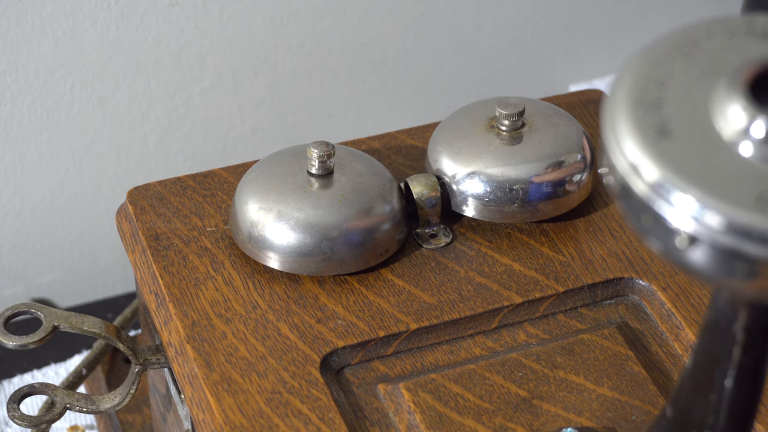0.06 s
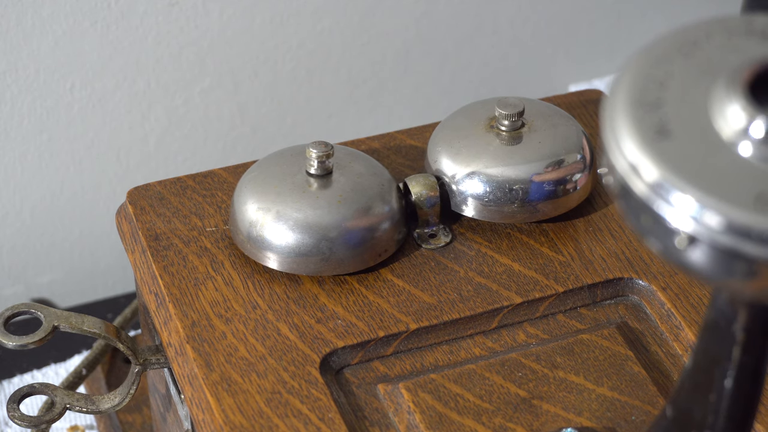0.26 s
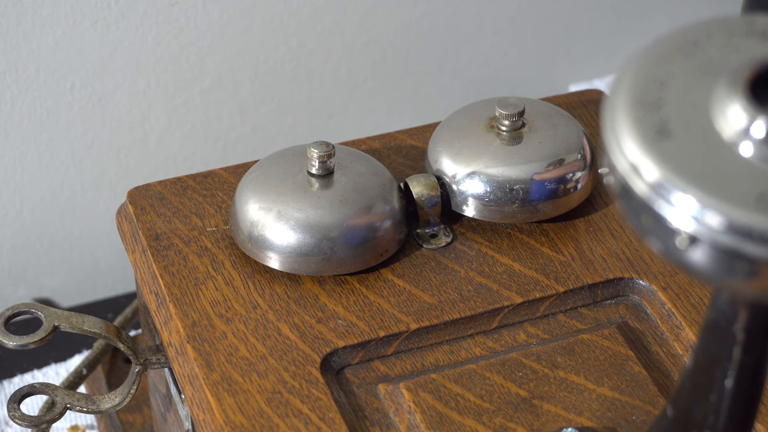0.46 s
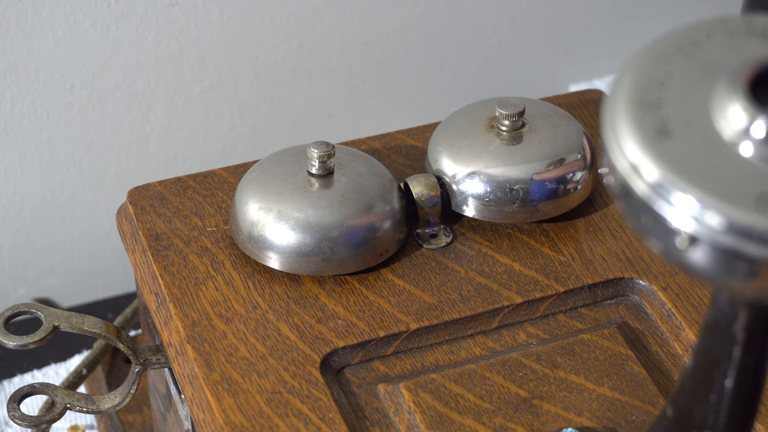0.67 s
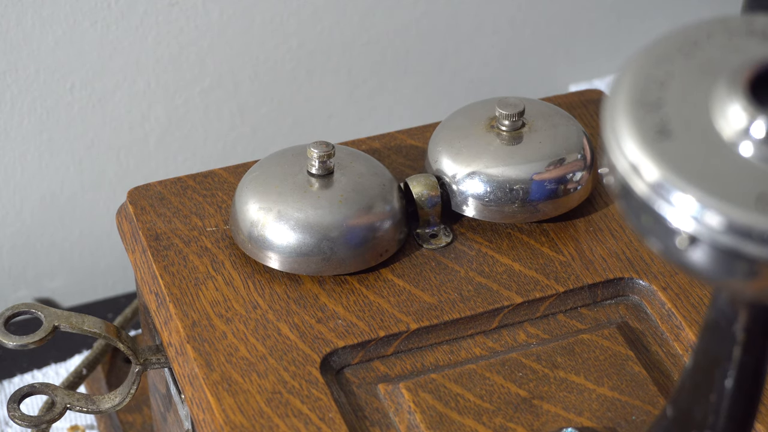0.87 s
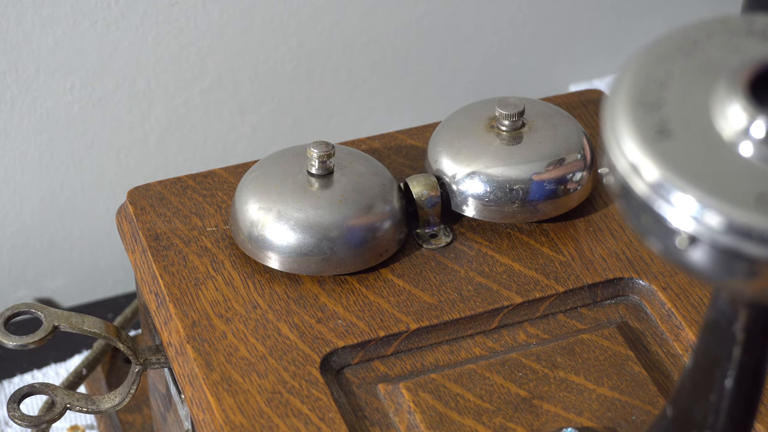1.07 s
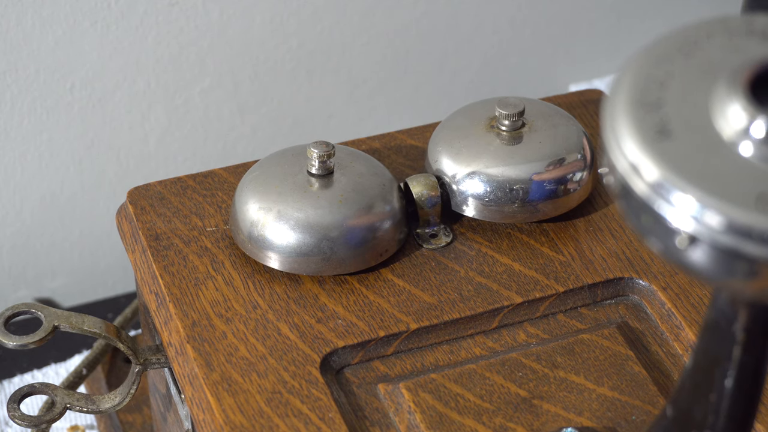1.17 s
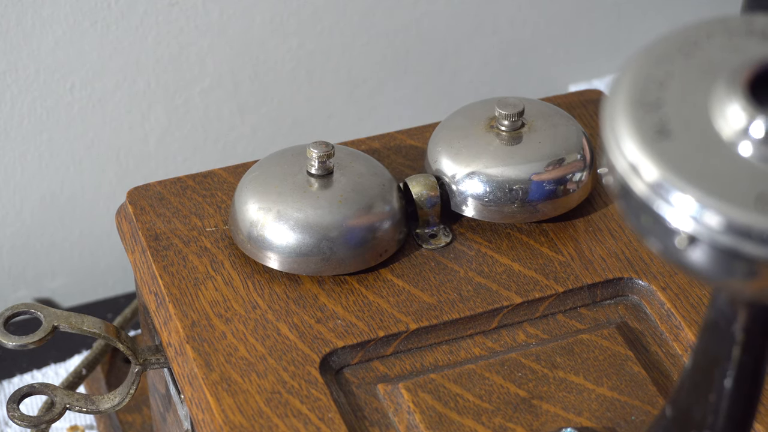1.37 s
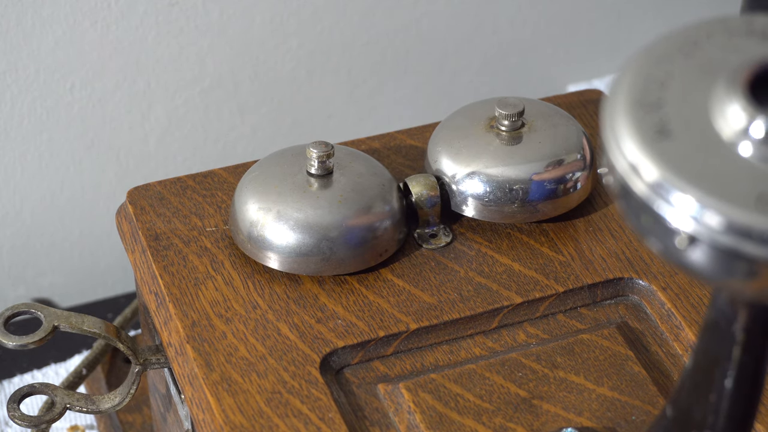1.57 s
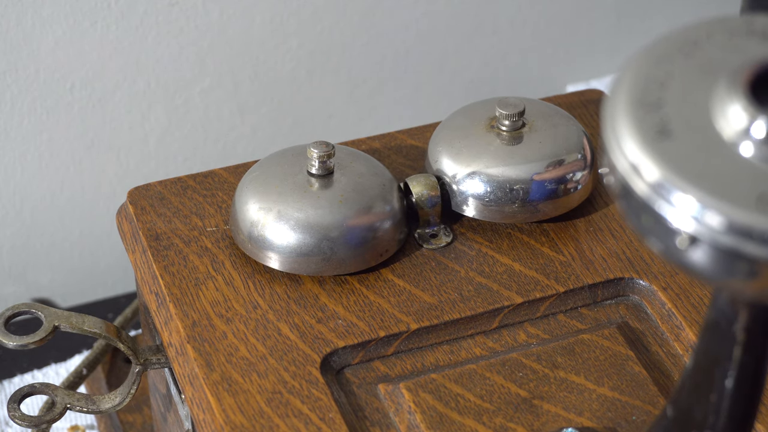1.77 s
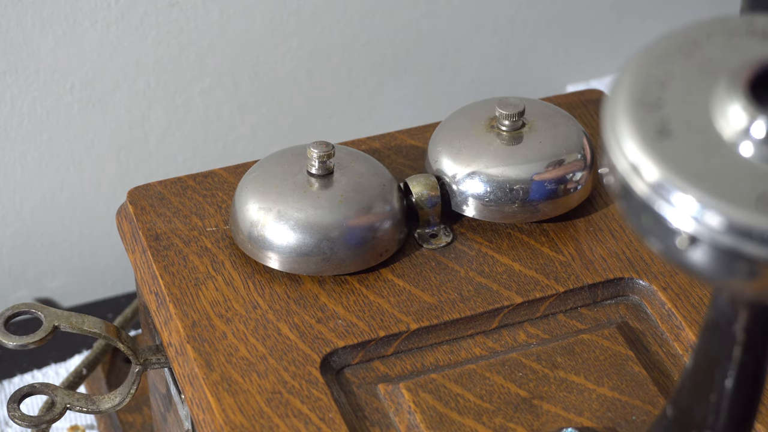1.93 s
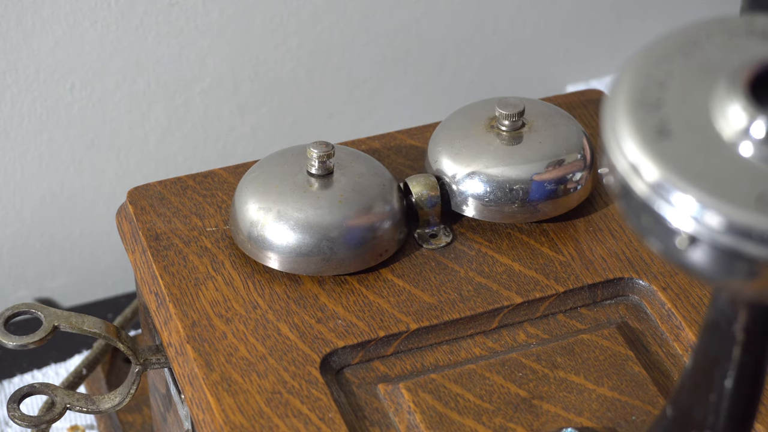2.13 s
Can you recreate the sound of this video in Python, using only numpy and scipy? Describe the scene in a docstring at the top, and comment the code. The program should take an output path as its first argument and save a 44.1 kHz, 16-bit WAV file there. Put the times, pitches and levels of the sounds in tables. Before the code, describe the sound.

An old telephone's two metal bells ring in a short, bright rattle and fade as crank gears rumble in its wooden case. A second turn brings another jingle, quickly choked. Heard close up in a small, quiet room.

```python
"""An old wooden wall telephone is cranked twice, close by, in a small, quiet room. One of its two steel
gongs is still ringing faintly as the gears start to rumble and knock in the case. The clapper chatters
on the low gong and brushes the high one, and both ring out with a slow wobble. On the second turn the
clapper chatters again, then stays on the low gong and chokes it. All along, a limiter (an automatic
volume control) ducks under the blows and swells back."""
import sys
import numpy as np
from scipy import signal
from scipy.fft import rfft, irfft, next_fast_len
from scipy.io import wavfile
from scipy.ndimage import uniform_filter1d, minimum_filter1d, map_coordinates

SR = 44100
rng = np.random.default_rng(int(sys.argv[2]) if len(sys.argv) > 2 else 0)


def store_pcm(level_fs):
    """Save levels as 16-bit WAV."""
    pcm = np.round(np.clip(level_fs, -1, 1) * 32767).astype(np.int16)
    wavfile.write(sys.argv[1], SR, np.atleast_2d(pcm).T)


N = 97020

# tone of the room's hush, a deep rumble and a faint hiss: f/Hz, level/dB
HUSH_TONE = [(25, -19), (60, -14), (130, -5), (220, -6.5), (320, 4), (450, -5), (800, -20.5), (2000, -18),
             (5000, -36.5), (16000, -35.5)]
RUMBLE_TONE = [(20, -3), (45, -3), (110, 0), (200, -8), (400, -40), (2000, -80)]
HISS_TONE = [(500, -20), (3000, -3), (6000, 0), (10000, -1), (16000, -3)]
# how the rumble and the hiss come and go: t/s, level/dB
RUMBLE_LEVEL = [(0, -61), (.2, -57.5), (.27, -68), (.45, -58), (.65, -66.5), (.8, -85)]
HISS_LEVEL = [(0, -66), (.21, -59.5), (.3, -82.5), (.9, -86), (1.1, -74), (1.25, -80), (1.4, -71),
              (1.9, -92.5)]
# stereo width of the noises: f/Hz, side level/dB
STEREO_WIDTH = [(100, -29), (250, -19.5), (500, -13.5), (1000, -9), (2000, -8), (8000, -2)]

# loudness of the gears in each turn of the crank: t/s, level/dB
FIRST_TURN = [(0, -56.5), (.05, -54), (.12, -54.5), (.21, -50), (.25, -34.5), (.3, -36), (.342, -21.5),
              (.365, -32), (.41, -30), (.445, -32), (.48, -38), (.54, -48.5), (.68, -63.5), (.9, -76)]
SECOND_TURN = [(1.02, -65), (1.12, -57.5), (1.32, -63), (1.36, -49.5), (1.385, -38.5), (1.46, -41.5),
               (1.505, -35), (1.535, -26.5), (1.61, -31), (1.635, -33), (1.73, -48.5), (1.83, -65),
               (1.98, -91), (2.12, -63.5), (2.2, -66)]
# resonances of the wooden case: f/Hz, width/Hz, level/dB
CASE_RESONANCES = [(123, 25, -4.5), (201, 12, -3.5), (314.4, 17, 4.5), (500, 17, 7.5), (599, 37, 1.5),
                   (708, 27, -2.5), (1040, 48, -5)]
# knocks of the gears: t/s, thud level/dB, tick level/dB, t60/s (the time to fade by 60 dB)
KNOCKS = [(0.023, -40.5, -45.5, 0.14), (0.13, -33.5, -49, .14), (0.223, -58, -23.5, 0.03),
          (0.425, -50.5, -29.5, 0.3), (1.03, -75, -57.5, 0.49), (1.109, -47.5, -45, 0.23),
          (1.213, -45, -60.5, 0.11), (1.358, -47.5, -53, 0.12), (1.394, -49, -49.5, 0.069),
          (1.483, -44, -57.5, 0.048), (1.547, -42, -17.5, 0.025), (2.053, -60.5, -59.5, 0.17),
          (2.092, -72, -75, 0.23)]
# tone of the gears and of their ticks: f/Hz, level/dB
GEAR_TONE = [(40, -32.5), (80, -20), (125, -4), (230, -2), (320, -0.5), (550, -4), (800, -3.5),
             (1300, -8.5), (2200, -9.5), (3200, -15), (5000, -21.5), (8000, -35), (16000, -48.5)]
TICK_TONE = [(100, -19.5), (600, -20), (1200, -2), (1750, -2.5), (2050, 7), (2350, -9.5), (2900, -9),
             (4200, -8), (6000, -21), (10000, -27), (16000, -48)]

# pitches of each gong's modes (the pure tones it rings with): f/Hz
LOW_HZ = [1013, 2601, 4641, 7031, 9762, 12822, 15235, 15726]
HIGH_HZ = [1379, 3444.5, 6010, 8998, 12391]
# one row per mode: level/dB, t60/s, left over right/dB, side level/dB
LOW_MODES = [(-42, 1.5, -1.5, -10.5), (-33, 1.46, -2, -6.5), (-26, 1.76, -5, -7), (-15.5, 0.99, -2, -10.5),
             (-8, 0.62, 1, -18), (-16.5, 0.27, 0.5, -8.5), (-18.5, 0.075, 1.5, -3.5), (-20, 0.062, 4, -6)]
HIGH_MODES = [(-48.5, 28, 0.5, -23), (-34, 10.4, 2, -8), (-31, 3.43, -0.5, -22.5), (-26, 1.37, 4.5, -0.5),
              (-40, .9, 6.5, -2)]
# each mode wobbles (beats) against a close twin: beat f/Hz, depth from 0 to 1
LOW_BEATS = [(1, .05), (2, .15), (1.5, .1), (8, .25), (9, .15), (7, .12), (200, .4), (130, .5)]
HIGH_BEATS = [(3.05, .65), (2, .5), (1.1, .25), (6.3, .6), (5.5, .3)]
# clapper hits (a negative time is before the start): t/s, level/dB, brightness/(dB per octave)
LOW_HITS = [(0.2331, 0.5, 0.5), (0.266, -1, 4), (0.2755, -4, 0), (0.2828, -11, -6), (0.29, -2, 7),
            (.308, -1, -2), (0.323, -9, -1.5), (.3542, 5, -0.5), (0.3748, 2.5, 5.5), (1.555, -2, 0),
            (1.592, -15.5, 13), (1.619, 5.5, -0.5), (1.65, -2, -4), (1.663, -7.5, 1.5), (1.6755, -10.5, -6),
            (1.6867, -5, -2.5), (1.698, -25, -11), (1.7114, -10.5, -2), (1.7185, -25, 2),
            (1.7238, -12, -2.5), (1.737, -11, 2.5), (1.748, -20.5, -2.5), (1.7547, -2.5, 2.5),
            (1.7608, 2.5, 1.5), (1.7745, -2.5, 0), (1.785, -24, -12), (1.7965, -30, -2), (1.801, -15, -1.5),
            (1.814, -11.5, 6)]
HIGH_HITS = [(-1.994, -22, -9.5), (.345, 2.5, 3.5)]
# change in what a hit gives each low-gong mode once the clapper leans on it: level/dB
LOW_LEAN = [-25.5, 4, 3, 0, -1, -1, 1.5, 0.5]
# light damping of each high-gong mode from DAMP_S on: extra fade/(dB per s)
HIGH_DAMPING = [5.6, 15, 41, 60, 60]

# tone of the clapper's crack, its mounting's clatter and the room's echo: f/Hz, level/dB
CRACK_TONE = [(500, -13), (3000, -1.5), (7000, 10), (10000, 1), (14000, 12), (16000, -1)]
CLATTER_TONE = [(60, -20), (150, -6.5), (400, -0.5), (1000, -1.5), (2000, 1), (3000, -7.5), (4200, -1.5),
                (5500, -16.5), (8000, -5.5), (11000, -6), (16000, -33)]
ECHO_TONE = [(100, -14.5), (7000, 10.5), (16000, -7)]
# what the limiter listens to: f/Hz, level/dB
LIMITER_EAR = [(100, -12), (7000, -39), (10000, -12), (13000, -13.5), (15000, 1.5)]

LEAN_S, DAMP_S = 1.5, 1.78  # the clapper leans towards the low gong, then rests on it
CHOKE_DB_PER_S = 157
ENERGY_KEPT, KICK_RAD = 0.29, 0.99  # share of ringing that outlasts a hit; typical jolt out of step
CONTACT_S, ATTACK_S = 0.0017, 0.0014  # length of a clapper hit; rise of a noise burst
TWIN_SPREAD_RAD = 0.17  # how differently the two ears hear the wobble
LIMIT_DB, RELEASE_DB_PER_S, HOLD_S = -25, 127, 0.0067
TIME = np.arange(N) / SR


def amp(db):
    """Turn decibels into a gain."""
    return 10 ** (np.asarray(db) / 20)


def fader(points):
    """A gain that glides through (t/s, level/dB) points."""
    return amp(np.interp(TIME, *np.transpose(points)))


def gains(points, hz):
    """Read gains from (f/Hz, level/dB) points on a log frequency axis."""
    f, db = np.transpose(points)
    return amp(np.interp(np.log(hz + 1), np.log(f + 1), db))


def filtered(x, response):
    """Scale each frequency in x by response(hz)."""
    size = next_fast_len(N + SR // 2)
    return irfft(rfft(x, size) * response(np.fft.rfftfreq(size, 1 / SR)), size)[..., :N]


def unit(x):
    """Scale to an average power of 1."""
    return x / np.sqrt(np.mean(x ** 2) + 1e-20)


def noise(tone):
    """Stereo noise with the given tone, wider in the treble."""
    response = lambda hz: gains(tone, hz) * np.array([np.ones_like(hz), gains(STEREO_WIDTH, hz)])
    mid, side = filtered(rng.standard_normal((2, N)), response)
    return unit(np.array([mid + side, mid - side]))


def blows(rows):
    """Loudness curve of (t/s, level/dB, t60/s) blows: each jumps up and fades, and their powers add."""
    shape = lambda age, t60: (1 - np.exp(-age / ATTACK_S)) * amp(-60 * age / t60)
    return np.sqrt(sum((amp(db) * shape(np.maximum(TIME - s, 0), t60)) ** 2 for s, db, t60 in rows))


def background():
    """The room's steady hush; over it, a deep rumble and a faint hiss come and go."""
    hush = amp(-62) * noise(HUSH_TONE)
    return hush + fader(RUMBLE_LEVEL) * noise(RUMBLE_TONE) + fader(HISS_LEVEL) * noise(HISS_TONE)


def wooden_case():
    """Gear noise, coloured by the resonances of the wooden case."""
    def response(hz):
        peaks = sum(amp(db) * 1j * hz * width / (centre ** 2 - hz ** 2 + 1j * hz * width)
                    for centre, width, db in CASE_RESONANCES)
        return 1 + amp(5) * peaks
    return unit(filtered(noise(GEAR_TONE), response))


def gears(grain_hz=160, grain_db=1.5):
    """The crank's gears grind unevenly in the case; each knock is a thud plus a tick."""
    grain = map_coordinates(rng.standard_normal(N // 20), [TIME * grain_hz])  # smooth random flutter
    grind = fader(FIRST_TURN + SECOND_TURN) * unit(amp(grain_db * grain) * wooden_case())
    thuds = blows([(s, db, t60) for s, db, _, t60 in KNOCKS]) * wooden_case()
    ticks = blows([(s, db, t60) for s, _, db, t60 in KNOCKS]) * noise(TICK_TONE)
    return grind + thuds + ticks


def gong(pitches, modes, beats, hits, damping_db_per_s, lean_db=0):
    """Each hit feeds every mode of the steel gong and jolts it out of step; close twins add a wobble."""
    hz, level, t60, pan, side, beat_hz, depth = np.column_stack([pitches, modes, beats]).T[:, :, None]
    lean, damping = np.reshape(lean_db, (-1, 1)), np.reshape(damping_db_per_s, (-1, 1))
    kicks = KICK_RAD * rng.standard_normal((len(hits), len(modes), 1))
    octaves = np.log2(hz / 9000)
    main, twin = np.zeros((2, len(modes), N), complex)
    ringing, phase = 0, 0
    ends = [hit[0] for hit in hits[1:]] + [N / SR]
    for (start, db, brightness), end, kick in zip(hits, ends, kicks):
        span = np.arange(max(round(start * SR), 0), round(end * SR))
        t = span / SR
        fed = amp(level + db + brightness * octaves + lean * (start > LEAN_S))
        peak = np.sqrt(ENERGY_KEPT * ringing ** 2 + fed ** 2)
        damped_db = damping * np.maximum(t - max(start, DAMP_S), 0)
        envelope = peak * amp(-60 * (t - start) / t60 - damped_db)
        ringing = envelope[:, -1:]  # what the next hit finds
        phase = phase + kick
        main[:, span] = envelope * np.exp(1j * phase)
        twin[:, span] = main[:, span] * depth * np.exp(2j * np.pi * beat_hz * (t - start))
    half_contact = int(CONTACT_S * SR / 2)
    soften = lambda x: uniform_filter1d(uniform_filter1d(x, half_contact), half_contact)
    tones = np.exp(2j * np.pi * hz * TIME)
    main, twin = soften(main) * tones, soften(twin) * tones
    ears = []
    for sign in (1, -1):  # left, right
        placement = amp(sign * pan / 2) * np.exp(1j * sign * np.arctan(amp(side)))
        pairs = main + twin * np.exp(-1j * sign * TWIN_SPREAD_RAD)
        ears.append((placement * pairs).imag.sum(axis=0))
    return np.array(ears)


def clapper(crack_t60=0.015, clatter_t60=0.14):
    """Each hit on the low gong gives a sharp crack and a longer clatter of the mounting."""
    crack = blows([(s, db - 10.5, crack_t60) for s, db, _ in LOW_HITS]) * noise(CRACK_TONE)
    clatter = blows([(s, db - 26.5, clatter_t60) for s, db, _ in LOW_HITS]) * noise(CLATTER_TONE)
    return crack + clatter


def room_echo(x, t60=0.24):
    """The small room answers with a short tail, different in each ear."""
    t = np.arange(SR // 2) / SR
    tail = rng.standard_normal((2, len(t))) * amp(-60 * t / t60) * (t > .003)
    echo = signal.fftconvolve(x, tail / np.linalg.norm(tail[0]), axes=1)[:, :N]
    return filtered(echo, lambda hz: gains(ECHO_TONE, hz))


def scene():
    """Gongs and clapper echo in the room, over the gears and the background."""
    low = gong(LOW_HZ, LOW_MODES, LOW_BEATS, LOW_HITS, CHOKE_DB_PER_S, LOW_LEAN)
    high = gong(HIGH_HZ, HIGH_MODES, HIGH_BEATS, HIGH_HITS, HIGH_DAMPING)
    bells = low + high + clapper()
    return bells + amp(-17) * room_echo(bells) + gears() + background()


def record(dry, top_hz=16500):
    """A treble-sensitive limiter ducks at once, holds and recovers steadily; then the very top is cut."""
    sensed = filtered(dry, lambda hz: gains(LIMITER_EAR, hz))
    power = uniform_filter1d((sensed ** 2).mean(axis=0), size=96)
    level_db = 10 * np.log10(np.abs(power) + 1e-12)
    hold = 2 * int(HOLD_S * SR / 2) + 1
    duck_db = minimum_filter1d(np.minimum(LIMIT_DB - level_db, 0), hold, origin=hold // 2)
    climb_db = RELEASE_DB_PER_S * TIME
    gain_db = np.minimum.accumulate(duck_db - climb_db) + climb_db  # drops freely, climbs at a set rate
    limited = dry * amp(uniform_filter1d(gain_db, size=48))
    return filtered(limited, lambda hz: 1 / np.sqrt(1 + (hz / top_hz) ** 100))


dry = scene()
out = record(dry)
store_pcm(out)
```